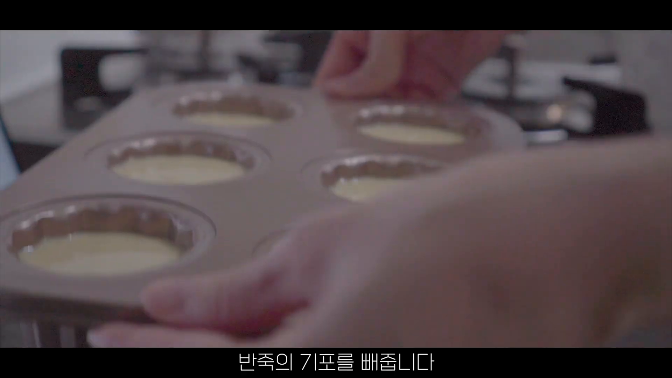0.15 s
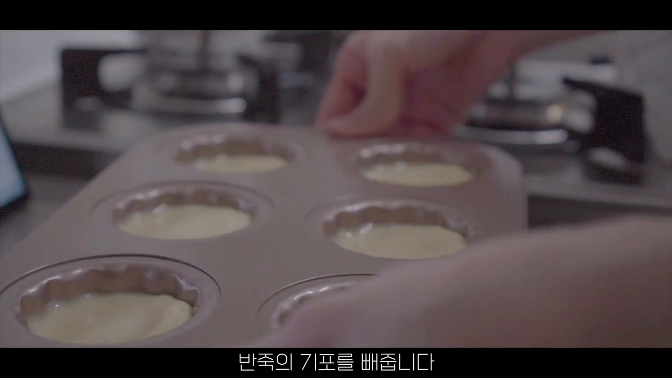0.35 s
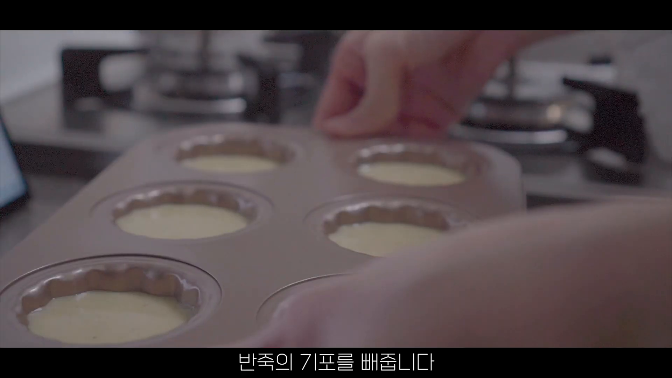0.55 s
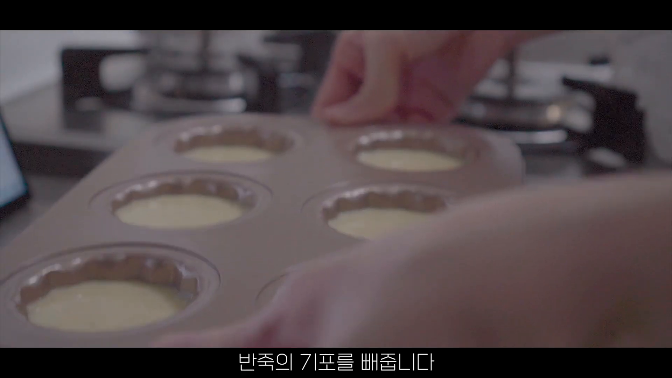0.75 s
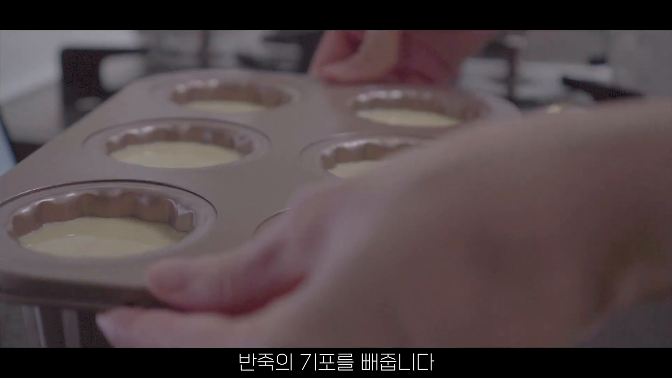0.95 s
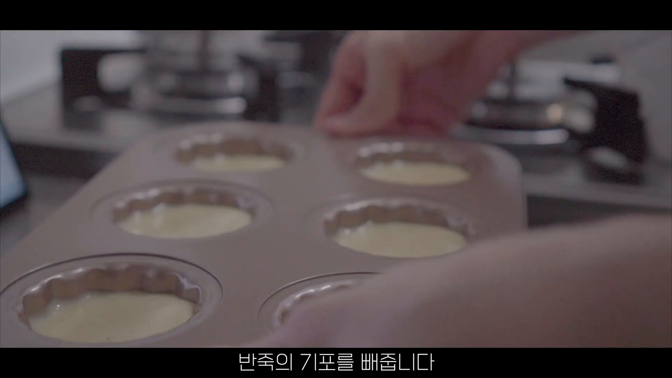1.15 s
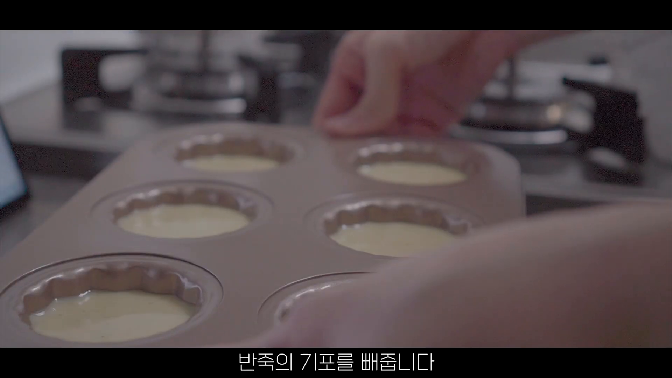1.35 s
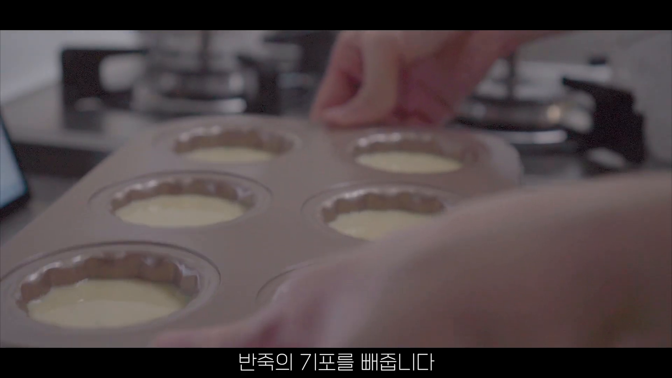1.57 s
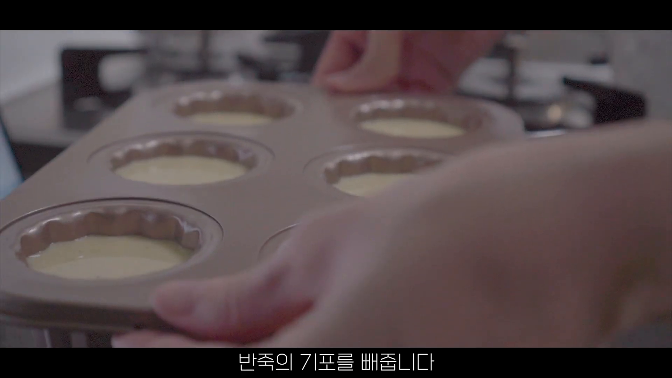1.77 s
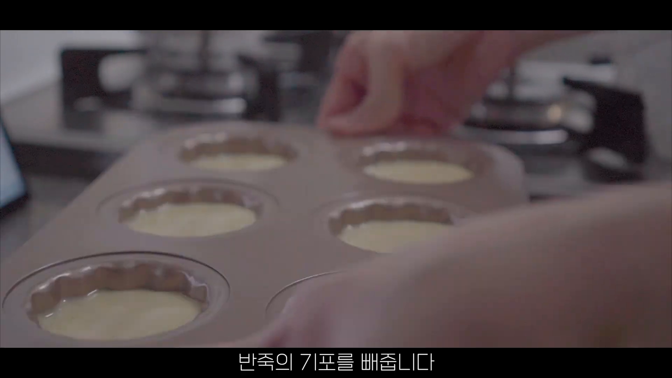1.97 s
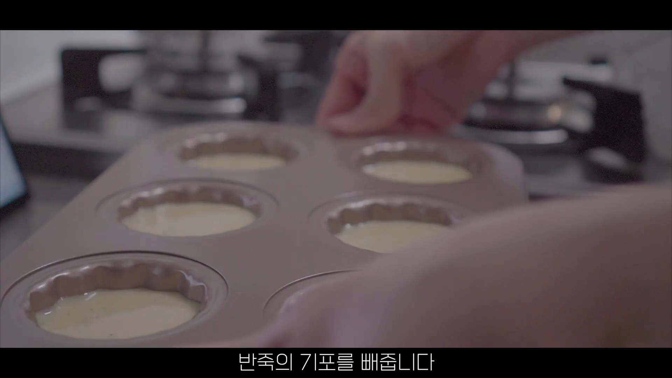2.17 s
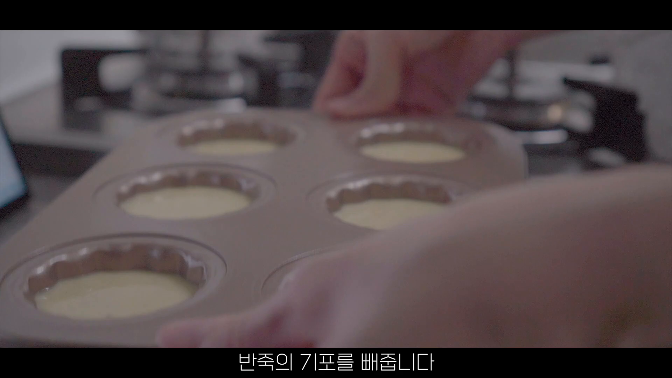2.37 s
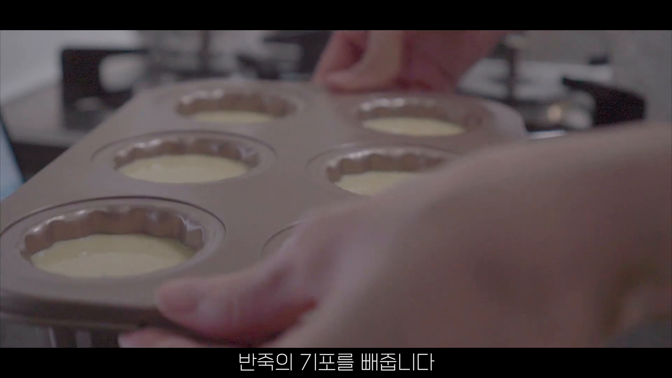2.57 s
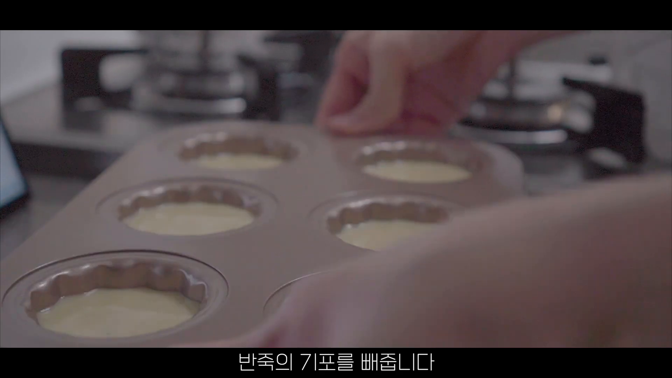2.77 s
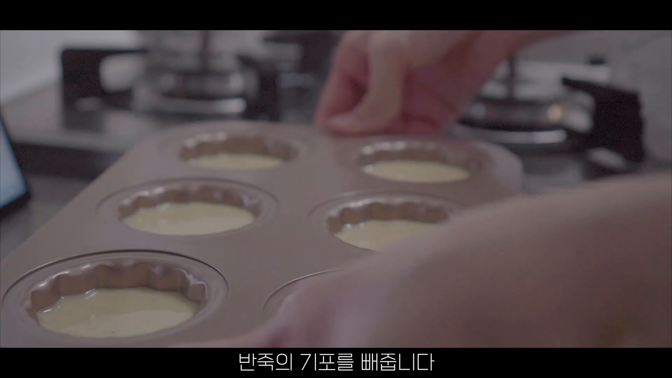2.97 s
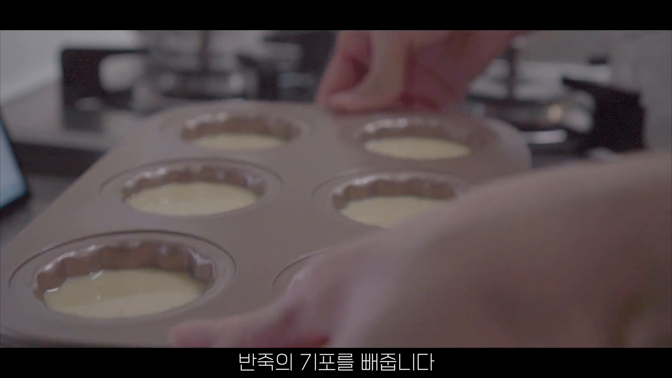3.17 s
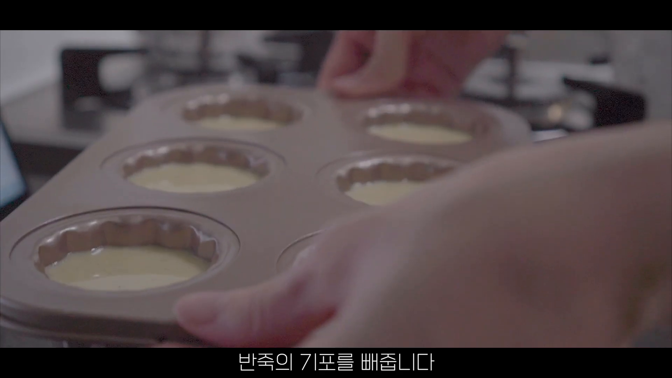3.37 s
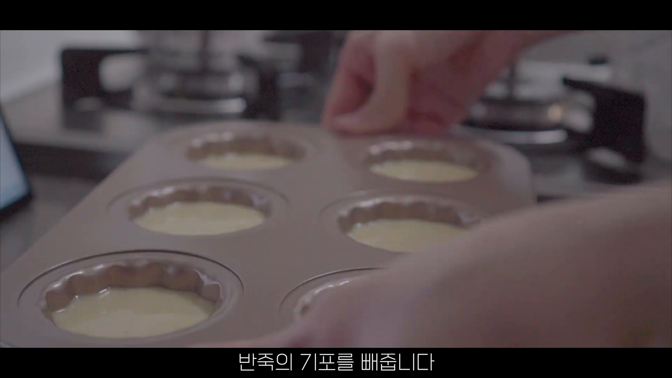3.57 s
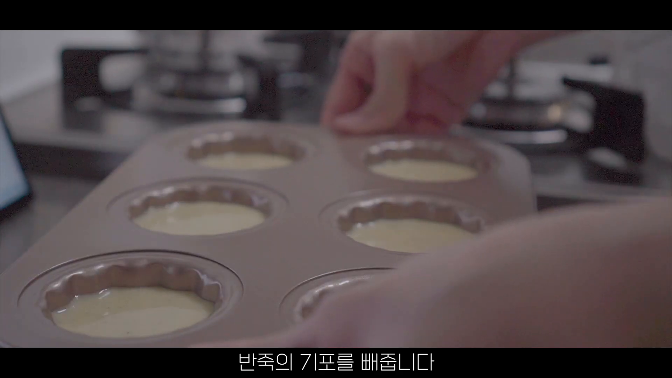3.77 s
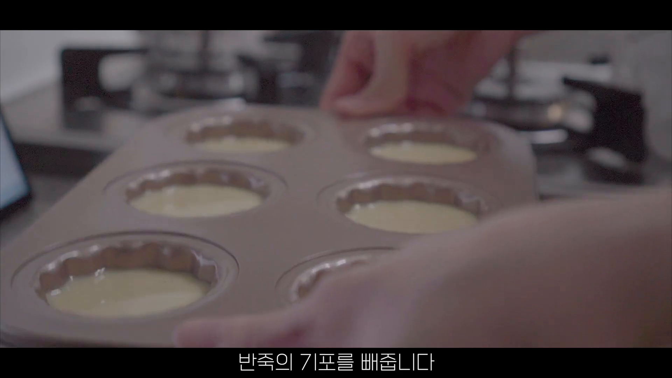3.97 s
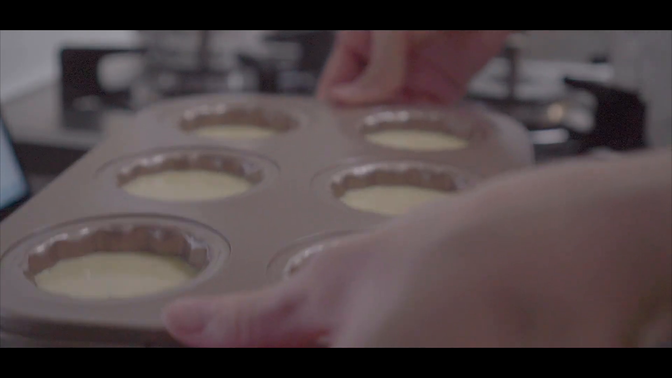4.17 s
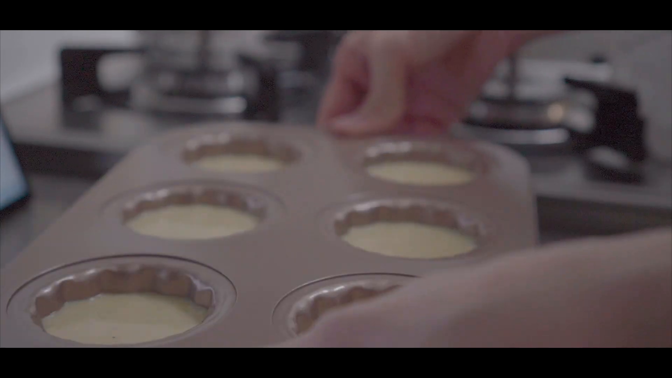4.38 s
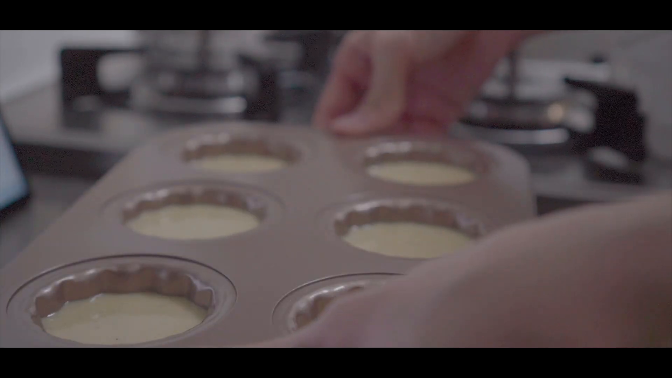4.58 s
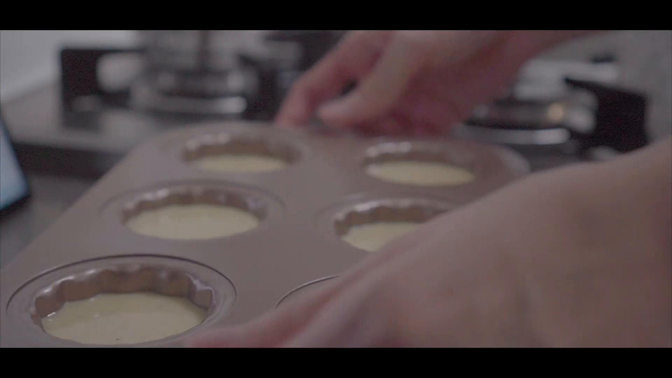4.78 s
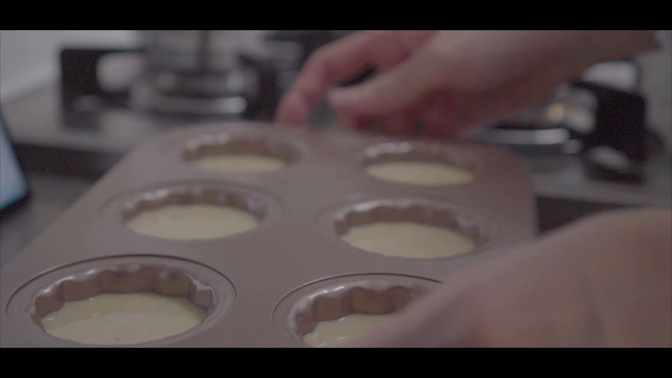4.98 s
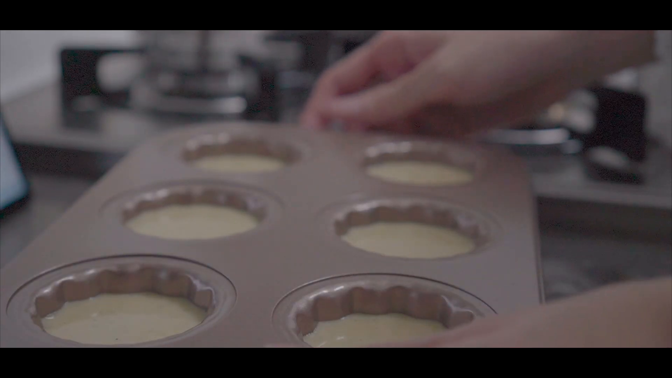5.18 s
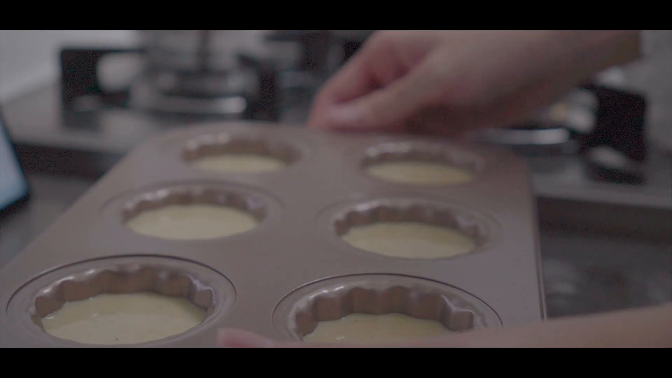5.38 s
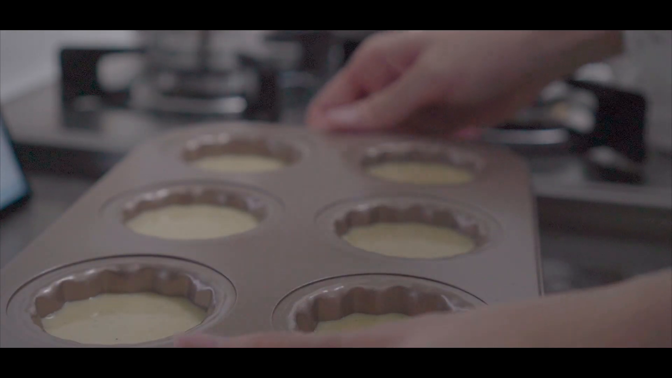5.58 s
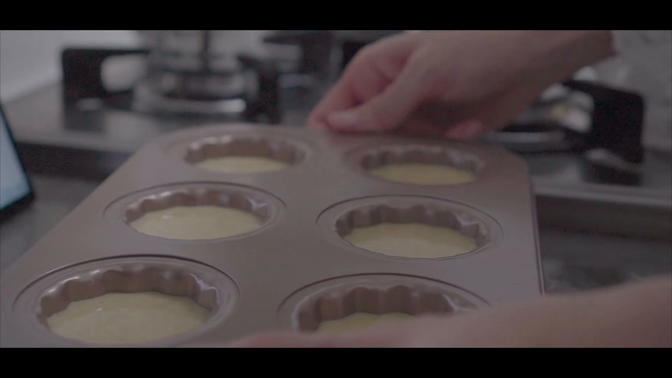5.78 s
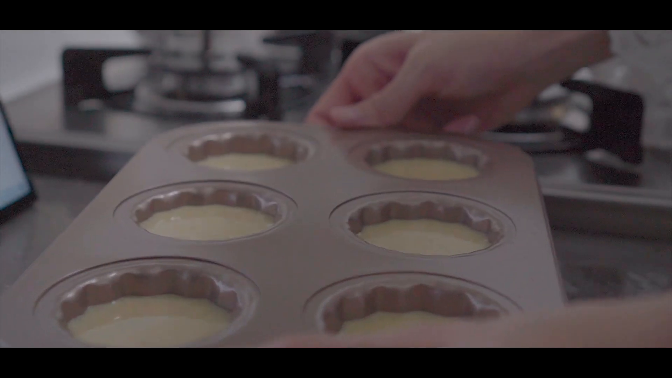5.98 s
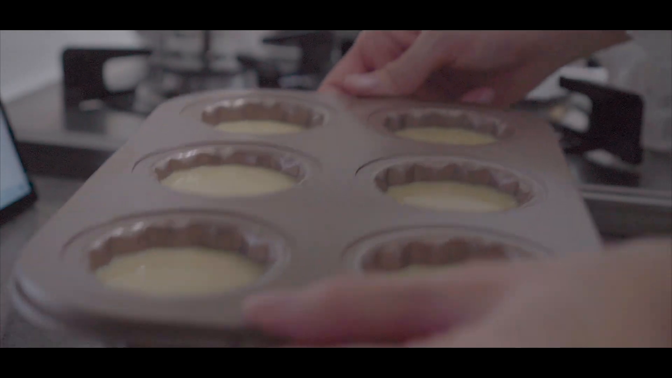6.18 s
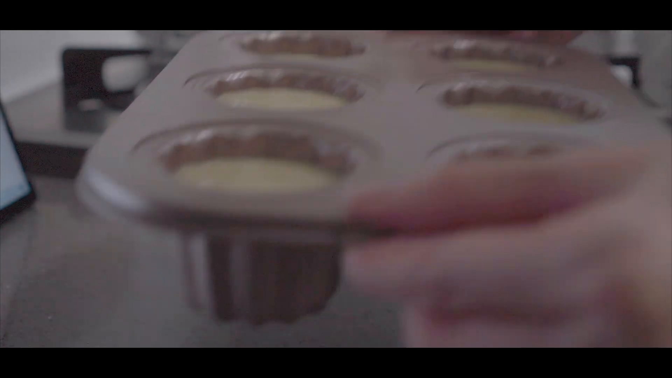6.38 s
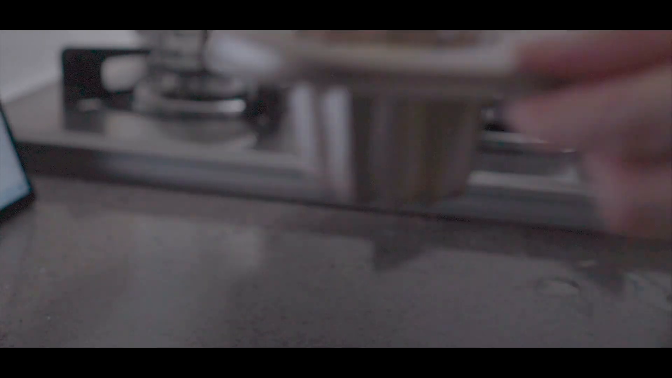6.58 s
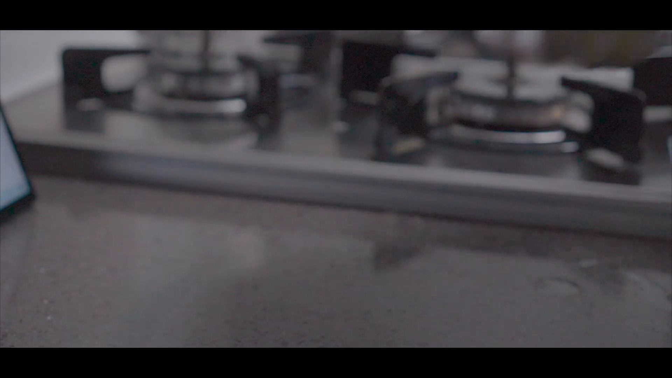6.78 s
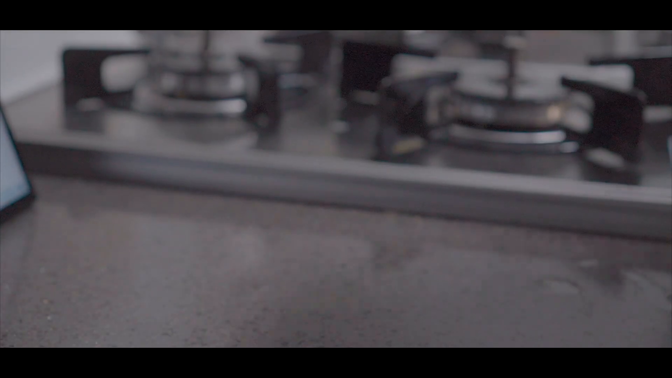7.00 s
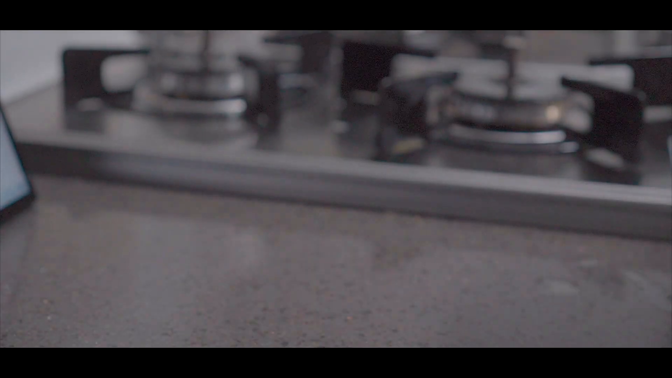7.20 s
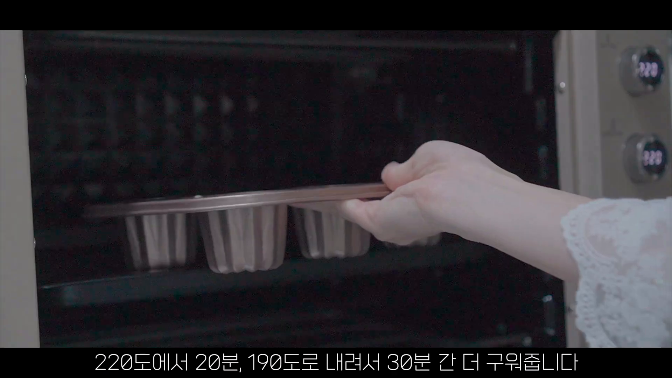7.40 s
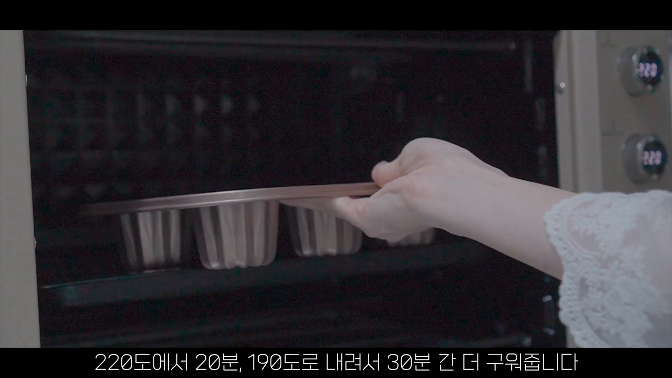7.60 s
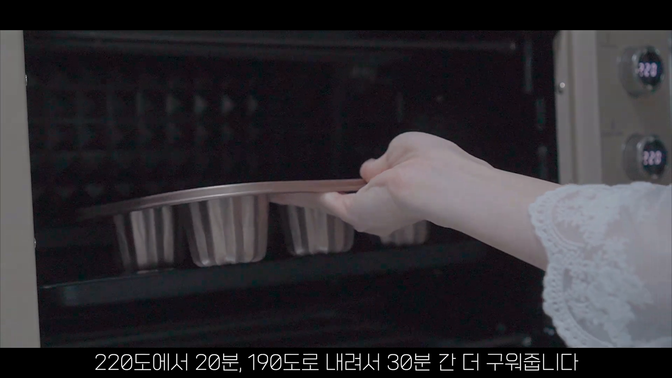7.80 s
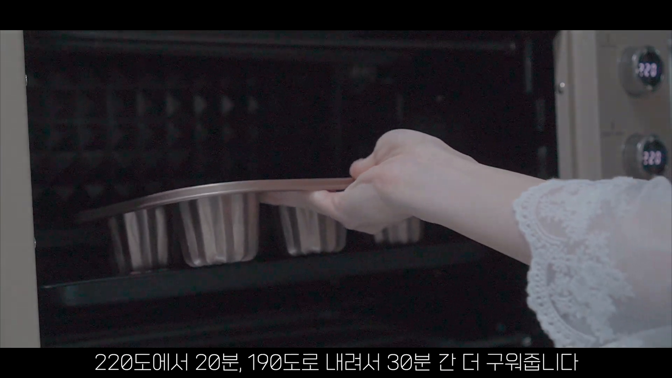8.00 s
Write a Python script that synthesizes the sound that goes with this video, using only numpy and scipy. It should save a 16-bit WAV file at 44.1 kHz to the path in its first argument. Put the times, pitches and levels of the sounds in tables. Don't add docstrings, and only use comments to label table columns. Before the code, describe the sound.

A very short low flutter of pouring batter is cut off at 0.1 s, leaving quiet kitchen air and a faint fridge hum. At about 0.3, 1.1, 1.9, 2.7, 3.5 and 4.3 s a full steel muffin pan is rapped hard on the counter: each blow is a tight clatter of cups, short and damped, with a dull counter boom, a sharp crack and short room reverberation. Nearby cast iron stove grates ring softly after each. The ringing fades from 4.5 s; faint rubbing and a narrow scrape come at 5.4-6.0 s. Around 6.5 s fingers brush the lifted pan and it ticks lightly, with another faint tick near 7.0 s. At 7.25 s an abrupt cut brings a low, hollow oven fan, while the pan grinds along a wire rack in short pushes, with clanks strongest near 7.6 s, until the end.

```python
import sys
import numpy as np
from scipy import signal
from scipy.fft import rfft, irfft, next_fast_len
from scipy.io import wavfile
from scipy.ndimage import map_coordinates

SR = 44100
rng = np.random.default_rng(int(sys.argv[2]) if len(sys.argv) > 2 else 0)


def wrap_up_sound(samples):
    columns = np.atleast_2d(samples).T
    tamed = np.clip(columns, -1, 1)
    steps = np.round(tamed * 32767).astype(np.int16)
    wavfile.write(sys.argv[1], SR, steps)


def decibels_to_gain(level_db):
    exponent = np.asarray(level_db, float) / 20
    return 10 ** exponent


N = 355005

CUTS_S = [
    .122,
    5.981,
    7.254,
]
# start_s, low_db, mid_db, upper_db, high_db
SHAKES = [
    (-.3, -78, -67.5, -62, -89),
    (.34, -78.5, -50.5, -74, -63.5),
    (1.115, -75.5, -51.5, -76, -70),
    (1.917, -57.5, -55, -70, -77),
    (2.714, -65.5, -60.5, -61, -69),
    (3.497, -67.5, -53.5, -64.5, -71.5),
    (4.282, -64, -65.5, -66, -64),
]
# start_s, end_s, grind_db, slip_over_grind_db
PUSHES = [
    (7.268, 7.41, -68, 21),
    (7.415, 7.532, -56.5, 13.5),
    (7.593, 7.62, -66.5, 3),
    (7.653, 7.685, -72, 24),
    (7.733, 7.808, -64.5, 20.5),
    (7.871, 7.928, -70, 22),
]


def unit(x):
    return x / np.sqrt(np.mean(x ** 2) + 1e-20)


def along(points, hz):
    point_hz, value = np.transpose(points)
    return np.interp(np.log(hz + 1), np.log(point_hz + 1), value)


def add(track, start_s, sound):
    i = round(start_s * SR)
    sound = sound[max(-i, 0):N - i]
    track[max(i, 0):][:len(sound)] += sound


def noise(gain, size=N):
    m = next_fast_len(size)
    spectrum = rfft(rng.standard_normal(m)) * gain(np.fft.rfftfreq(m, 1 / SR))
    return unit(irfft(spectrum, m)[:size])


def shaped_noise(points, size=N):
    return noise(lambda hz: decibels_to_gain(along(points, hz)), size)


def hump(centre_hz, octaves):
    return lambda hz: np.exp(-.5 * (np.log2((hz + 1) / centre_hz) / octaves) ** 2)


def wobble(rate_hz):
    knots = rng.standard_normal(int(N * rate_hz / SR) + 4)
    return map_coordinates(knots, [np.arange(N) * rate_hz / SR])


def burst(gain, t, t60):
    return decibels_to_gain(-60 * t / t60) * noise(gain, size=len(t))


def ring(modes, t, scatter_db, detune=0.018, flip=True):
    hz, db, t60 = np.transpose(modes)[:, :, None]
    luck = rng.standard_normal((3, len(modes), 1))
    sign = np.sign(luck[0]) if flip else 1
    swing = np.sin(2 * np.pi * hz * (1 + detune * luck[2]) * t) * sign
    return np.sum(decibels_to_gain(db + scatter_db * luck[1] - 60 * t / t60) * swing, axis=0)


def tail():
    # pitch_hz, t60_s
    kitchen_t60 = [(60, 0.36), (250, 0.41), (1000, 0.4), (2500, .42), (5000, .46), (10000, 0.31),
                   (16000, 0.075)]
    hz, t, z = signal.stft(rng.standard_normal(SR // 2), SR, nperseg=256)
    fade = decibels_to_gain(-60 * t / along(kitchen_t60, hz)[:, None])
    decay = signal.istft(z * fade, SR, nperseg=256)[1]
    return decay / np.linalg.norm(decay)


def room(x):
    wet, step = np.zeros(N), round(.4 * SR)
    for i in range(round(.3 * SR), N, step):
        if x[i:i + step].any():
            add(wet, i / SR + .004, signal.fftconvolve(x[i:i + step], tail()))
    return wet


def fridge():
    # pitch_hz, level_db
    hum_lines = [(59.2, -81), (97, -86), (119, -87.5), (296, -84), (587, -85.5), (759, -90.5), (5722, -106)]
    t = np.arange(N) / SR
    return sum(decibels_to_gain(db + 3.5 + 2.5 * wobble(6.2)) * np.sin(2 * np.pi * hz * t) for hz, db in hum_lines)


def kitchen_air():
    # pitch_hz, db_per_hz
    air_spectrum = [(12, -44.5), (20, -19), (49, 2), (80, -15), (100, -9.5), (388, -12.5), (422, -15),
                    (542, -18), (590, -11), (976, -24), (2140, -31.5), (4180, -39.5), (5850, -38),
                    (13200, -48.5), (16000, -60)]
    settle_s, recover_s = 0.12, 1.2
    t = np.arange(N) / SR
    last_rap_s = np.max([np.where(t > s, s, -N) for s, *_ in SHAKES[1:]], axis=0)
    gain_db = 7.5 * np.exp(-t / settle_s) - 5 * np.exp(-(t - last_rap_s) / recover_s)
    return decibels_to_gain(-71 + 1.27 + gain_db + 0.43 * wobble(5.4)) * shaped_noise(air_spectrum)


def pouring():
    # pitch_hz, db_per_hz
    pour_spectrum = [(24, -31), (40, -3), (99, 2.5), (155, -17), (297, 2.5), (516, -24), (585, 2),
                     (751, -24), (8130, -39.5), (16000, -54.5)]
    t = np.arange(N) / SR
    return (t < CUTS_S[0]) * decibels_to_gain(-59.5 + 0.74 * wobble(45)) * shaped_noise(pour_spectrum)


def oven_fan(fade_db):
    # pitch_hz, db_per_hz
    fan_spectrum = [(24, -47), (40, -14), (106, -7.5), (215, -2), (281, -8.5), (511, -8), (559, -3),
                    (802, -12.5), (997, -15.5), (1350, -9), (3000, -29), (3900, -62.5), (6600, -120)]
    # pitch_hz, width_hz, level_db
    cavity = [(213, 16, 0.5), (300, 44, 3), (401.6, 25, 7.5), (556.5, 12, 3), (987, 86, 2), (1269, 18, -1)]

    def gain(hz):
        box = 1 + sum(decibels_to_gain(db) / (1 + ((hz - centre) / width) ** 2) for centre, width, db in cavity)
        return decibels_to_gain(along(fan_spectrum, hz)) * box

    return decibels_to_gain(-45.5 + fade_db + 1.64 * wobble(50)) * noise(gain)


def pan_slide(fade_db):
    # pitch_hz, db_per_hz
    drag_spectrum = [(1060, -23), (1800, -0.5), (2430, -21), (2820, -1), (3020, -21), (3330, -9.5),
                     (7000, -21.5), (9100, -49), (15400, -120)]
    # pitch_hz, db_per_hz
    wire_spectrum = [(4000, -23), (5500, -8), (7400, -6), (8600, 1), (9600, -9), (12200, -9), (14600, -4),
                     (15600, -11), (16200, -24)]
    # start_s, level_db, pitch_hz, t60_s
    ping = (7.698, -42, 3200, .024)
    rest_db, grip_s = -76.5, 0.0126
    slip_every_s, slip_scatter_db = 0.026, 2
    time = np.arange(N) / SR
    pushes_db = []
    for start, end, db, _ in PUSHES:
        grip = np.clip(np.minimum(time - start, end - time) / grip_s + 1, 0, 1)
        pushes_db.append((db - rest_db) * grip)
    push_db = np.max(pushes_db, axis=0)
    out = decibels_to_gain(-65.5 + fade_db + 0.2 * push_db + 3.0 * wobble(60)) * shaped_noise(drag_spectrum)
    out += decibels_to_gain(rest_db + push_db + 1.7 * wobble(150)) * shaped_noise(wire_spectrum)
    t = np.arange(SR // 4) / SR
    for start, end, db, slip_db in PUSHES:
        luck = rng.standard_normal(12)
        slips = [burst(hump(11000, 0.78), t[:441], t60=.011) for _ in luck]
        for k, s in enumerate(np.arange(start, end, slip_every_s)[:len(luck)]):
            add(out, s, decibels_to_gain(db + slip_db - 11.0 + slip_scatter_db * luck[k]) * slips[k])
    s, db, hz, t60 = ping
    add(out, s, ring([(hz, db, t60)], t, scatter_db=0, detune=0) * (1 - np.exp(-t / .002)))
    return out


def rack_catches():
    # start_s, peak_db, box_relative_db, bright_relative_db
    catch_events = [(7.3, -39.5, 3, -12), (7.513, -39, 0, 11), (7.519, -37, 0, 13), (7.527, -43.5, 12.5, 7),
                    (7.583, -31, -3, -4), (7.592, -27.5, -1.5, -11.5), (7.611, -39, -2, -8),
                    (7.725, -38, -30, -12), (7.881, -40.5, -2, -16), (7.909, -56, 6, -16),
                    (7.945, -41, -4, -29), (8.011, -43, 12.5, -20)]
    # pitch_hz, level_db, t60_s
    rack_modes = [(966, 1.5, 0.071), (1150, -4, 0.066), (1263, -0.5, 0.097), (1432, -1.5, 0.049)]
    # pitch_hz, level_db, t60_s
    box_modes = [(220.9, 0, 0.28), (295, 2.5, 0.12), (403, -1, 0.2), (548, 9, 0.072)]
    # pitch_hz, level_db, t60_s
    bright_modes = [(1720, 0, .04), (2250, -1, .04), (2650, -2, .04), (2860, -14, .15), (3270, -1, .04),
                    (3960, -2, .035), (4700, -4, .035), (5650, -4, .03), (6400, -6, .03)]
    hits, t = np.zeros(N), np.arange(SR // 4) / SR
    for s, db, box_db, bright_db in catch_events:
        catch = decibels_to_gain(-7.5) * ring(rack_modes, t, scatter_db=-2.0)
        catch += decibels_to_gain(box_db - 11.5) * ring(box_modes, t, scatter_db=1.0)
        catch += decibels_to_gain(bright_db - 9) * ring(bright_modes, t, scatter_db=1.5)
        catch += decibels_to_gain(bright_db - 11) * burst(hump(3880, 0.73), t, t60=0.073)
        add(hits, s, decibels_to_gain(db) * catch * (1 - np.exp(-t / 0.0007)))
    return hits


def hands():
    # start_s, end_s, level_db, centre_hz, width_octaves
    rubs = [
        (5.4, 5.657, -86.5, 2330, 0.3),
        (5.59, 5.646, -83, 2290, 0.66),
        (5.878, 5.977, -89, 4400, .25),
        (5.89, 5.976, -68.5, 1100, 0.11),
        (6.329, 6.41, -79, 8330, 1),
        (6.44, 6.539, -80.5, 3930, .9),
        (6.93, 6.996, -84, 4500, .8),
    ]
    # start_s, peak_db, centre_hz, t60_s
    ticks = [
        (6.488, -81, 3180, .03),
        (6.536, -51.5, 1920, 0.1),
        (6.537, -57, 980, 0.22),
        (6.56, -64.5, 2800, 0.26),
        (6.963, -66, 2980, .03),
        (4.78, -74, 8800, 0.018),
    ]
    out = np.zeros(N)
    for start, end, db, hz, octaves in rubs:
        u = np.linspace(0, 1, round((end - start) * SR))
        swell = np.sin(np.pi * u ** 1.1) ** 0.4
        add(out, start, decibels_to_gain(db) * swell * noise(hump(hz, octaves), size=len(u)))
    t = np.arange(SR // 4) / SR
    for s, db, hz, t60 in ticks:
        add(out, s, decibels_to_gain(db - 4.5) * burst(hump(hz, 1.0), t, t60))
    return out


def grates():
    # pitch_hz, level_db, t60_s
    grate_modes = [
        [(223, -1, 2.3)],
        [(612, 0.43, 0.8), (623, -1, 1.1)],
        [(850, .5, 1.4), (1109, -14, 5.7)],
        [(1215, 0.6, 2.1)],
    ]
    out, t = np.zeros(N), np.arange(2 * SR) / SR
    stops_s = [row[0] for row in SHAKES[1:]] + [N / SR]
    for (s, *shake_db), stop in zip(SHAKES, stops_s):
        modes = [(hz, db + shake, t60) for grate, shake in zip(grate_modes, shake_db) for hz, db, t60 in grate]
        held = (1 - np.exp(-t / .02)) * (t < stop - s + .005)
        add(out, s, ring(modes, t, scatter_db=0, detune=0) * held)
        add(out, s, decibels_to_gain(-55.5) * burst(hump(30, .35), t, t60=1.8) * (1 - np.exp(-t / .01)))
    return out


def pan():
    # start_s, cup_ring_db, thud_relative_db, hardness_db
    landings = [(0.338, -10, -8, -5.5), (0.3499, -7.5, -16, -11), (0.357, -13.5, -17, -11.5),
                (0.372, -12.5, -13, -13.5), (0.379, -21, -2.5, -18.5), (1.113, -10, -12.5, -12),
                (1.119, -6.5, -6.5, -8.5), (1.122, -12.5, -10, -3.5), (1.129, -18.5, -18, -17.5),
                (1.139, -17, -7, -12), (1.148, -23, -6, -5.5), (1.915, -9, -8, -10.5),
                (1.921, -9.5, -7.5, -5.5), (1.924, -15.5, -14, -9), (1.935, -18, -6, -10.5),
                (1.946, -20, -5, -9), (2.712, -13, -18.5, -6), (2.717, -8, -13, -10),
                (2.723, -13, -10.5, -16), (2.735, -12.5, -11, -16), (2.75, -25.5, -8, -12.5),
                (3.4954, -5, -8, -11), (3.502, -14, -11, -9), (3.509, -17, -8, -13),
                (3.517, -18.5, -3.5, -8.5), (4.281, -7.5, -25, -9.5), (4.286, -15.5, -8.5, -4.5),
                (4.299, -12, -11, -18.5), (4.306, -26, 5, -1.5)]
    # start_s, cup_ring_db
    nudges = [
        (5.87, -42),
        (5.883, -52),
        (5.899, -50.5),
        (5.952, -56.5),
    ]
    # pitch_hz, level_db, t60_s
    cup_modes = [(784, -14, .03), (868, -11.5, .05), (1043, -2, 0.07), (1150, -22.5, .35),
                 (1157, -0.3, 0.051), (1240, -14.5, 0.01), (1368, -13, 0.057), (1543, -12.5, 0.074)]
    # pitch_hz, level_db, t60_s
    counter_modes = [(59.6, -16.5, 0.14), (99.2, -8, 0.24), (147, -3, .1), (214.5, -1, 0.12),
                     (314, -4.5, .12), (349, -0.5, 0.14), (395.2, 2.5, 0.13), (500, 7.5, 0.045),
                     (608, -2.5, 0.072)]
    # pitch_hz, level_db, t60_s
    rim_modes = [(1735, 3.5, 0.031), (2506, 2.5, 0.021), (2800, -3, .025), (3770, -4, 0.035),
                 (4430, -4, 0.022), (4652, -5, 0.052), (7940, -10, 0.051), (9940, -23, 0.18),
                 (12400, -27, .15)]
    # pitch_hz, db_per_hz
    sheet_spectrum = [(120, -38.5), (250, -12.5), (500, -4), (1100, -1.5), (1500, -5), (2400, -10),
                      (3200, -16), (4300, -12.5), (5500, -38.5)]
    # pitch_hz, db_per_hz
    crack_spectrum = [(3500, -40), (5000, 0), (6200, -3), (7000, -7), (8200, -5), (10000, -8), (11000, -15),
                      (14000, -20.5), (16000, -34.5)]
    # pitch_hz, db_per_hz
    spread_spectrum = [(41, -39.5), (70, -7.5), (162, -9), (218, -1.5), (394, -0.5), (934, -3.5),
                       (1150, -5), (1500, -11), (3000, -19.5), (4500, -22), (7000, -28.5), (10000, -31.5),
                       (12300, -40), (16000, -52)]
    out, spread, t = np.zeros(N), np.zeros(N), np.arange(SR // 5) / SR
    clap = np.fft.fftshift(irfft(decibels_to_gain(along(spread_spectrum, np.fft.rfftfreq(512, 1 / SR)))))
    clap /= np.linalg.norm(clap)
    nudge_thud_db, nudge_hard_db = -0.5, -21
    soft_landings = [(s, db, nudge_thud_db, nudge_hard_db) for s, db in nudges]
    for s, db, thud_db, hard_db in landings + soft_landings:
        blow = decibels_to_gain(-7.5) * ring(cup_modes, t, scatter_db=1.0, detune=0.0058, flip=False)
        blow += decibels_to_gain(thud_db - 10.0) * ring(counter_modes, t, scatter_db=2.0, detune=.008)
        blow += decibels_to_gain(hard_db - 11.0) * ring(rim_modes, t, scatter_db=1)
        blow += decibels_to_gain(hard_db + 2.0 - 60 * t / 0.054) * shaped_noise(sheet_spectrum, len(t))
        crack_db = -11.5 + 0.82 * hard_db
        blow += decibels_to_gain(crack_db - 60 * t / 0.024) * shaped_noise(crack_spectrum, len(t))
        add(out, s + .0007, decibels_to_gain(db) * blow * (1 - np.exp(-t / .0004)))
        add(spread, s + .002, decibels_to_gain(db) * signal.fftconvolve(clap, tail()))
    return out, spread


def scene():
    t = np.arange(N) / SR
    (raps, spread), touches = pan(), hands()
    fade_db = -7 * np.exp(-np.abs(t - CUTS_S[2]) / 0.017)
    slide = (oven_fan(fade_db) + pan_slide(fade_db)) * (t > CUTS_S[2])
    catches = rack_catches()
    wet = room(decibels_to_gain(-21.5) * raps + decibels_to_gain(-5) * touches + decibels_to_gain(-7) * catches) + decibels_to_gain(0.5) * spread
    trimmed = (t > CUTS_S[1]) & (t < 6.3)
    kitchen = kitchen_air() + fridge() + pouring()
    return ((raps + wet) * ~trimmed + touches + grates() + kitchen + slide + catches)[None]


def top_cut(x):
    return signal.sosfilt(signal.butter(12, 16520, fs=SR, output="sos"), x)


def record(dry):
    x = dry / (1 + np.abs(dry / .3) ** 3) ** (1 / 3)
    x = signal.sosfilt(signal.butter(10, 15700, fs=SR, output="sos"), x)
    return top_cut(x)


dry = scene()
out = record(dry)
wrap_up_sound(out)
```